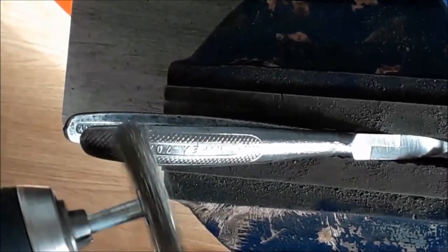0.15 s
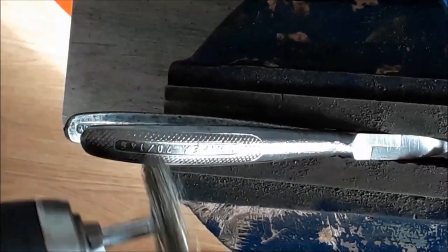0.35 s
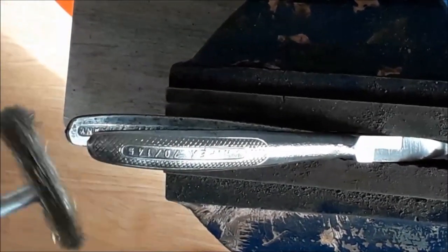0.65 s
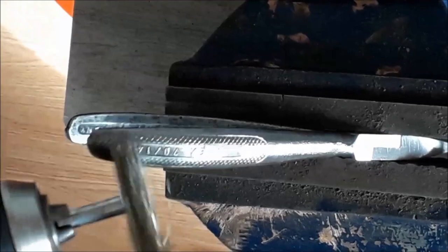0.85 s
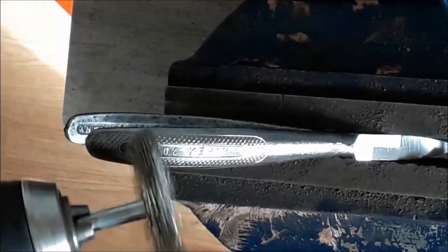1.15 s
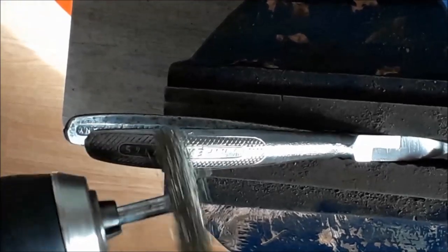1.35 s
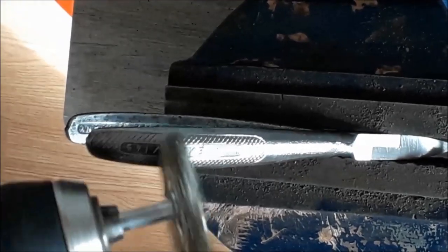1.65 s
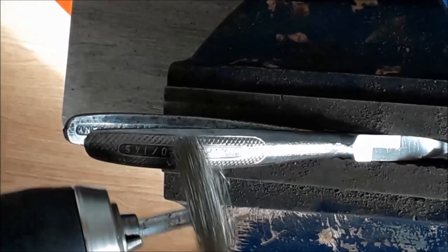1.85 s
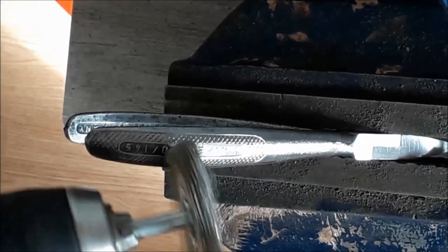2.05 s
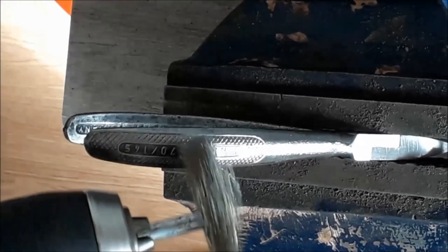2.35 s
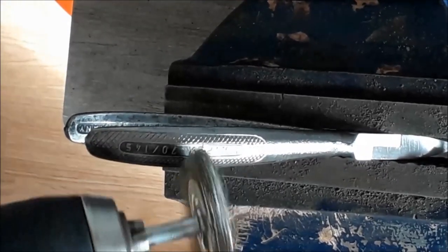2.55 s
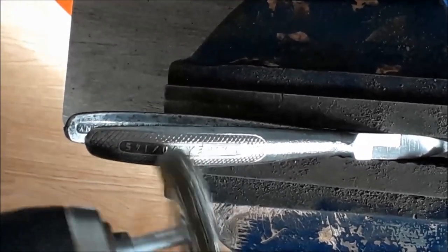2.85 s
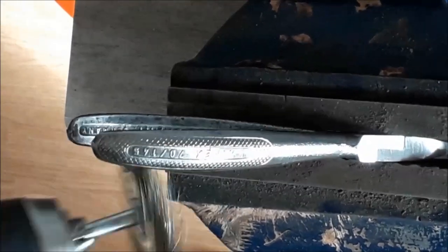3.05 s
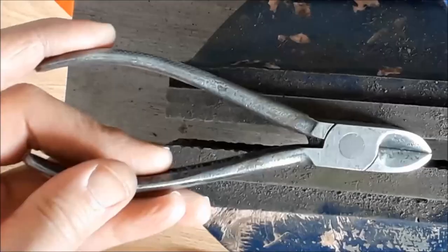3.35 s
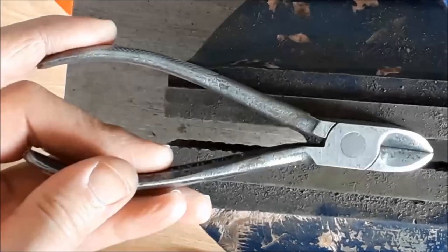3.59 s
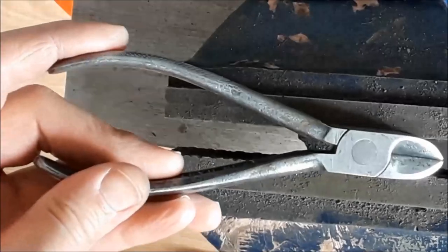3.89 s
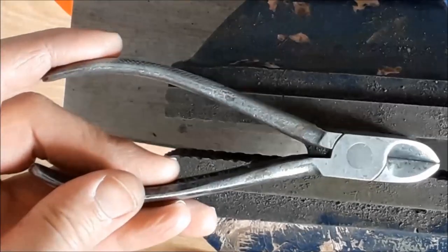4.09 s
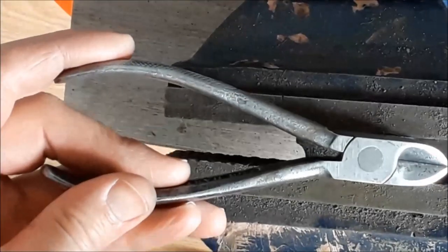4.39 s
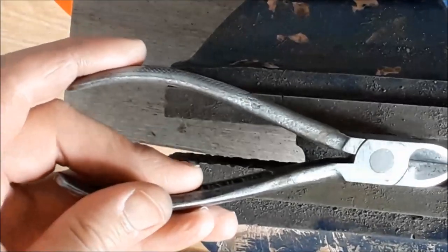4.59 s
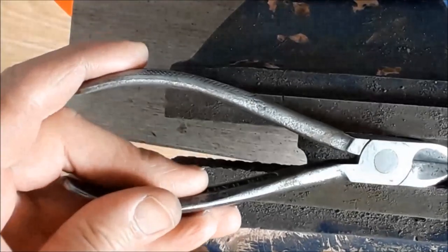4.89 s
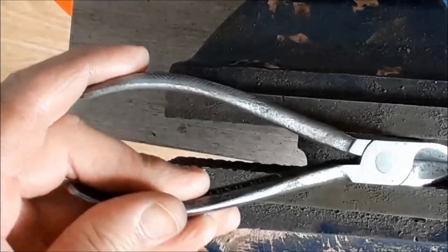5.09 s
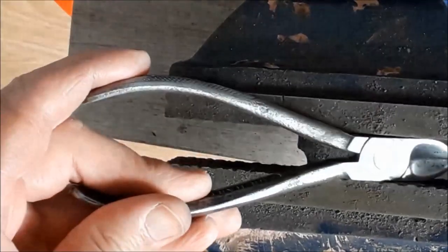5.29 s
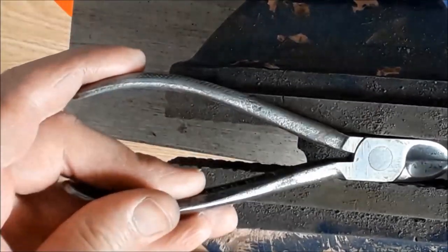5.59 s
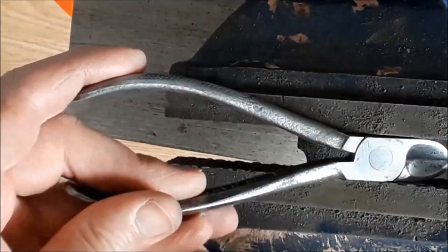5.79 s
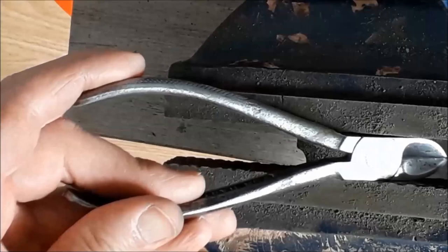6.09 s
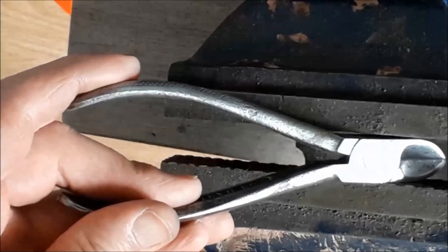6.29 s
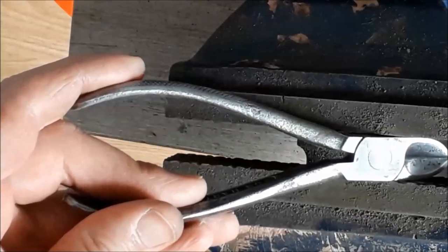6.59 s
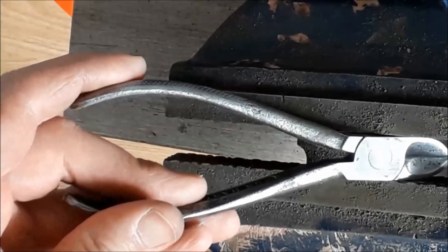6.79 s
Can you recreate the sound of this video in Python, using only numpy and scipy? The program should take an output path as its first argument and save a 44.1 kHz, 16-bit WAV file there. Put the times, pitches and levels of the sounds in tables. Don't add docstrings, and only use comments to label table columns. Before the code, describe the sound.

Close and mono in a small, fairly dry room: a shrill drill with a spinning wire brush scrubs clamped steel, pulsing slightly several times a second and speeding up when lifted. A hard cut ends it midway. Then faint hum and hand rustle, scattered wooden knocks, one very hard, a heavy set-down with a low thump and bounces, bright steel clinks, soft touches and one late firm knock.

```python
import sys
import numpy as np
from scipy import signal
from scipy.fft import rfft, irfft, next_fast_len
from scipy.io import wavfile
from scipy.ndimage import uniform_filter1d, map_coordinates

SR = 44100
rng = np.random.default_rng(int(sys.argv[2]) if len(sys.argv) > 2 else 0)


def boost(x):
    u = np.asarray(x, float) / 20
    return 10 ** u


def dump_mix(stems):
    frames = np.atleast_2d(stems).T
    limited = np.clip(frames, -1, 1)
    pcm = np.round(limited * 32767).astype(np.int16)
    wavfile.write(sys.argv[1], SR, pcm)


N = 306054
TIME = np.arange(N) / SR
CUT_S = 3.4135

# f/Hz, level/dB [per Hz]
HUM_SPECTRUM = [(24, -54), (40, -3.5), (240, -1.5), (381, -4.5), (420, -3), (808, -9.5), (873, -5.5),
                (1170, -14), (1590, -8.5), (4000, -37), (5200, -51.5), (8800, -120)]
RUSTLE_SPECTRUM = [(1180, -37.5), (2000, -7.5), (2160, 1.5), (2340, -12), (2530, -5), (5550, -1.5),
                   (7190, -2.5), (11600, -1), (15800, -16)]
# t/s, level/dB
HANDS_STIR = [(3.42, -43.5), (3.6, -47.5), (3.88, -52), (4.15, -47), (4.28, -48.5), (4.44, -60),
              (4.69, -56), (4.9, -62), (5.4, -71), (5.6, -50), (5.99, -75), (6.17, -56), (6.32, -80),
              (6.56, -77), (6.63, -52.5), (6.74, -72), (6.94, -79)]
HUM_DB, HUM_FOLLOWS = -58.5, 0.35
# f/Hz, level/dB [per Hz]
MIC_SPECTRUM = [(1760, -40), (3000, -1.5), (4280, -9.5), (5930, -7), (6770, -7.5), (7460, -10), (9650, -12),
                (11400, 3), (15800, -18)]
MIC_DB = -71.5
TOP_HZ = 15880

# f/Hz, t60/s
ROOM_DECAY = [(100, 0.28), (300, 0.22), (1000, 0.26), (4000, 0.24), (12000, 0.19)]
# f/Hz, width/Hz, level/dB
BENCH_MODES = [(213.6, 54, 1.5), (341, 35, -1.5), (469, 33, -2.5), (698, 174, -9), (1040, 100, -5)]
# f/Hz, level/dB, t60/s
STEEL_RING = [(6320, 3.5, 0.045), (10640, -14.5, 0.046), (11700, -4.5, 0.066)]
# t/s, peak level/dB, thud level/dB, treble level/dB, clack f/Hz
WOOD_KNOCKS = [
    (3.756, -28, 0, -21, 1470),
    (3.763, -38, 2, -19, 1780),
    (3.834, -29.5, -9, -24, 1710),
    (3.953, -14, -9.5, -47, 1460),
    (4.352, -6.5, -23, -18.5, 1590),
    (4.368, -41, -25, -22, 2090),
    (4.645, -42, -19, -30, 1680),
    (4.662, -24.5, -15, -22, 1560),
    (6.242, -11, -14.5, -22.5, 1570),
]
# t/s, peak level/dB, thud level/dB, treble level/dB, clack f/Hz
HEAVY_SET_DOWN = [
    (4.892, -13, -7, -16, 764),
    (4.903, -13.5, -7, -13, 1960),
    (4.911, -17, -11.5, -25, 820),
    (4.944, -15, -13.5, -21, 770),
    (4.988, -18.5, -8, -17, 770),
    (5.061, -24.5, -12, -22, 640),
    (5.12, -34, -8, -26, 830),
    (5.539, -21, -21, -10, 760),
]
# t/s, peak level/dB, thud level/dB, treble level/dB, clack f/Hz
STEEL_CLATTER = [(3.559, -36, -14, -12, 2060), (5.249, -21, -14, -19, 1730),
                 (5.256, -19.5, -11.5, -12.5, 1670), (5.262, -37, -14, -9, 2150),
                 (5.286, -24, -7, -5, 2050), (5.311, -25, -9, -26, 1630), (5.484, -28.5, -21, -11, 1550),
                 (5.498, -32, -22, -3, 2300), (5.516, -30.5, -20, -2.5, 3270),
                 (5.527, -24, -8.5, -0.5, 3060), (5.533, -12.5, -19.5, -6, 6050)]
# t/s, peak level/dB, thud level/dB, clack f/Hz
SOFT_TOUCHES = [(3.708, -34, 5, 1040), (3.724, -35.5, 6.5, 1590), (3.87, -34, -6, 1590),
                (4.01, -30, -23, 1530), (4.028, -34, -20, 2200), (4.046, -34.5, -16, 1840),
                (4.066, -36, -14, 1840), (4.205, -34, -18, 1610), (4.342, -22.5, 3.5, 1540),
                (4.859, -33.5, 5, 1560), (5.434, -42.5, -7.5, 1610), (5.699, -45.5, 3, 988),
                (5.946, -45, -1, 1050), (5.97, -42, -9, 985), (6.027, -59.5, 9, 991), (5.901, -57, 4, 990),
                (6.13, -50, -19, 1590), (6.22, -39, 3, 1590), (6.234, -16.5, -1.5, 1590),
                (6.57, -49, -3, 1580), (6.596, -38, 3, 1530), (6.617, -30.5, -7, 1260)]
# t/s, peak level/dB, clack f/Hz
THIN_TICKS = [
    (3.5194, -44, 5790),
    (4.2906, -45, 5040),
    (4.577, -45, 6910),
    (4.7268, -45, 5860),
    (5.019, -37, 5300),
]
KNOCK_MS, HEAVY_MS, CLATTER_MS, SOFT_MS, TICK_MS = 19.6, 173, 27.5, 38, 39
SOFT_TREBLE_DB, TICK_THUD_DB, TICK_TREBLE_DB = -32.5, -40, -16
JAW_HZ, JAW_WIDTH_HZ, JAW_DB = 1590, 220, 3.5
THUMP_S, TINK_S = 4.901, 3.872

# t/s, speed f/Hz
SHAFT_SPEED = [(0, 455.5), (.13, 453.5), (.3, 451.8), (.41, 452.3), (.51, 456.5), (.61, 461), (.7, 461.7),
               (.82, 461.3), (1, 452.8), (1.15, 455.7), (1.4, 453.7), (2.55, 453.8), (2.7, 454.5),
               (2.85, 456.6), (3.08, 456.9), (3.19, 463), (3.27, 459.6), (3.42, 460.4)]
# multiple, level/dB pressed on, level/dB running free
SHAFT_ORDERS = [(3, -63, -52.5), (4, -48, -43), (5, -42, -49), (6, -42, -47), (7, -41, -52),
                (9, -37.5, -44), (10, -19.5, -35), (11, -37, -37), (12, -35, -58), (13, -48, -41),
                (14, -43, -37), (15, -52, -34), (16, -45, -35), (17, -33, -45), (18, -40, -34),
                (19, -28, -35), (20, -29.5, -26), (21, -36, -37), (22, -28, -34), (23, -39, -35),
                (24, -38, -36), (25, -41, -36), (26, -30.5, -36), (27, -32, -42), (28, -39, -44),
                (29, -35, -44), (30, -35.5, -35), (31, -42, -44), (32, -41, -34), (34, -49, -40)]
# multiple, level/dB pressed on, level/dB running free
GEAR_SIDEBANDS = [(10.42, -34.5, -38), (4.55, -46.5, -62), (1, -62, -57)]
# f/Hz, level/dB [per Hz]
FAN_SPECTRUM = [(60, -63.5), (250, -47.5), (420, -41), (800, -16), (1400, -25.5), (1900, -13.5),
                (2500, -20), (3100, -4.5), (4100, -13), (5300, -2.5), (9000, -7), (11200, -6),
                (12200, -1.5), (12600, -11), (15800, -13)]
WIRE_SPECTRUM = [(700, -58.5), (1500, -20), (2100, -14), (3100, -21.5), (4200, -11), (5800, -11.5),
                 (9000, -7.5), (11300, -8), (11800, -2), (12350, -5), (12600, -13.5), (15800, -21.5)]
# f/Hz, width/Hz, level/dB
VICE_MODES = [(103, 97, -18.5), (315, 70, -6.5), (513.4, 14, 2), (589, 33, -2), (1032, 94, -8),
              (2050, 310, -16)]
# t/s, scrub level/dB through the vice
WIRE_CONTACT = [(0, -29.5), (.46, -28.5), (.49, -40), (.53, -28.5), (.65, -40), (.72, -52.5), (.83, -53.5),
                (.86, -31.5), (.94, -37.5), (.98, -30), (1.25, -29.5), (1.31, -26), (1.45, -29.5),
                (2.3, -32.5), (2.9, -32.5), (3.18, -26), (3.3, -49), (3.42, -54.5)]
WHEEL_SKIPS = [.12, .17, 1.14, 1.25, 1.335, 1.65, 1.84, 2.045, 2.18, 2.45, 2.91, 2.975]
SKIP_DB, SKIP_S = -13, .016
GEAR, WHEEL_START = 59.02, -1.15
SWING_HZ = 2.5
FIRM_DB, HANDLE_HZ = -32, 213.5
SWAY_DB, SWAY_GROWS = -32, 2.07
HISS_DB, HISS_GROWS = -15, .05


def unit(x):
    return x / np.sqrt(np.mean(x ** 2) + 1e-20)


def along(points, hz):
    f, v = np.transpose(points)
    return np.interp(np.log(hz + 1), np.log(f + 1), v)


def curves(rows):
    s, *cols = np.transpose(rows)
    return [np.interp(TIME, s, c) for c in cols]


def wobble(rate):
    knots = rng.standard_normal(int(N * rate / SR) + 4)
    return map_coordinates(knots, [np.arange(N) * rate / SR])


def filtered(x, response):
    m = next_fast_len(len(x) + 8192)
    return irfft(rfft(x, m) * response(np.fft.rfftfreq(m, 1 / SR)), m)[:len(x)]


def resonances(modes):
    def response(f):
        total = 0
        for k, (centre, width, db) in enumerate(modes):
            damping = 1j * f * width
            total = total + (-1) ** k * boost(db) * damping / (centre * centre - f * f + damping)
        return total
    return response


def rush(spectrum, patchy_db):
    z = signal.stft(rng.standard_normal(N), nperseg=512)[2]
    field = uniform_filter1d(rng.standard_normal(z.shape), size=6, axis=0)
    field = uniform_filter1d(field, size=10, axis=1)
    noise = signal.istft(z * boost(patchy_db * unit(field)), nperseg=512)[1][:N]
    return unit(filtered(noise, lambda hz: boost(along(spectrum, hz))))


def tail(size):
    hz, t, z = signal.stft(rng.standard_normal(size), SR, nperseg=256)
    decay = boost(-60 * t / along(ROOM_DECAY, hz)[:, None])
    x = signal.istft(z * decay, SR, nperseg=256)[1][:size]
    return x / np.linalg.norm(x)


def workshop():
    rustle_db, = curves(HANDS_STIR)
    hum_db = HUM_DB + HUM_FOLLOWS * (rustle_db + 58)
    hum = boost(hum_db + 1.5 * wobble(18)) * rush(HUM_SPECTRUM, patchy_db=-0.5)
    rustle = boost(rustle_db - 6.0 + 1.2 * wobble(30)) * rush(RUSTLE_SPECTRUM, patchy_db=1.2)
    mic_hiss = boost(MIC_DB) * rush(MIC_SPECTRUM, patchy_db=1.2)
    return (hum + rustle + mic_hiss) * (TIME > CUT_S)


def contacts():
    soft = [(s, db, thud_db, SOFT_TREBLE_DB, hz) for s, db, thud_db, hz in SOFT_TOUCHES]
    ticks = [(s, db, TICK_THUD_DB, TICK_TREBLE_DB, hz) for s, db, hz in THIN_TICKS]
    kinds = [(WOOD_KNOCKS, KNOCK_MS), (soft, SOFT_MS), (HEAVY_SET_DOWN, HEAVY_MS),
             (STEEL_CLATTER, CLATTER_MS), (ticks, TICK_MS)]
    return [(*row, ms) for rows, ms in kinds for row in rows]


def bright_edge(f):
    highpass = (1j * f / 1900) ** 2 / (1 + 1j * f / 1900) ** 2
    return highpass / (1 + 1j * f / 6000) ** 2 / (1 + (f / 12800) ** 12)


def wooden_thud(f):
    highpass = (1j * f / 130) ** 2 / (1 + 1j * f / 130) ** 2
    return resonances(BENCH_MODES)(f) * highpass / (1 + 1j * f / 1300) ** 3


def clack_of(hz):
    body = resonances([(hz, .6 * hz, 0), (1.7 * hz, 1.6 * hz, -3)])
    jaw = resonances([(JAW_HZ, JAW_WIDTH_HZ, JAW_DB)])
    return lambda f: body(f) ** 2 * (1 + jaw(f))


def bench_shake(t):
    modes = [(93.5, 19, 5), (121, 22, -0.5), (172, 71, -0.5)]
    shake = filtered(rng.standard_normal(len(t)) * boost(-60 * t / 0.43), resonances(modes))
    return boost(-11.0) * shake / np.abs(shake).max()


def steel_tink(t):
    ring = sum(boost(level - 60 * t / t60) * np.sin(2 * np.pi * hz * t) for hz, level, t60 in STEEL_RING)
    return boost(-38) * ring * (1 - np.exp(-t / 0.0011))


def knocks():
    out, size = np.zeros(N + SR), SR // 2
    t = np.arange(size) / SR
    for s, db, thud_db, treble_db, hz, ms in contacts():
        length = max(ms, 3) / 1000
        attack = (1 - np.exp(-t / min(.1 * length, .005))) ** 2
        burst = rng.standard_normal((3, size)) * boost(-60 * t / length) * attack
        burst *= boost(3.6 * np.repeat(rng.standard_normal(size // 90 + 1), 90)[:size])
        colours = [wooden_thud, clack_of(hz), bright_edge]
        shares_db = [thud_db + 2.5, -4, treble_db + 9.5]
        for noise, colour, share_db in zip(burst, colours, shares_db):
            direct = filtered(noise, colour)
            build_up = 1 - np.exp(-t / (0.0013 + 0.25 * length))
            walls = filtered(tail(size) * build_up, colour)
            both = direct + boost(-2) * walls * np.linalg.norm(direct) / np.linalg.norm(walls)
            out[round(s * SR):][:size] += boost(db + share_db) * both / np.abs(direct).max()
    out[round(THUMP_S * SR):][:size] += bench_shake(t)
    out[round(TINK_S * SR):][:size] += steel_tink(t)
    return out[:N]


def gear_whine(load, wheel, shaft):
    whine = np.zeros(N)
    for k, pressed_db, free_db in SHAFT_ORDERS + GEAR_SIDEBANDS:
        db = free_db + load * (pressed_db - free_db)
        bite_swing_db = 6 * load * np.cos(wheel + (1.3 if k == 22 else .3)) * (21 < k < 29)
        bite_swing_db += 6 * load * np.cos(wheel - 2.1) * (k == 9)
        flutter_db = (3.6 - 3.2 * load if k == 10 else 1.8) * wobble(15) + .12 * k * wobble(70)
        phase = k * shaft + .0011 * k * k * wobble(110)
        whine += boost(db + bite_swing_db + flutter_db + 4 + .03 * k) * np.sin(phase)
    return whine


def fan_and_wire_hiss(scrub_db, load, bite_db, shaft):
    hiss_db = HISS_DB + HISS_GROWS * (scrub_db - FIRM_DB) + 0.32 * wobble(8.2)
    fan = rush(FAN_SPECTRUM, patchy_db=1.5) * boost(.3 * np.cos(shaft))
    wires = boost(0.5 * bite_db + 1.1 * wobble(40)) * load * rush(WIRE_SPECTRUM, patchy_db=2.0)
    return boost(hiss_db - 3.0) * (fan + wires)


def wire_scrub(scrub_db, bite_db, wheel):
    scrub_db = scrub_db + .7 * np.cos(wheel + 2.9) + 0.92 * wobble(10) + 2.1 * wobble(45)
    unrest_db = 0.72 * wobble(150) + 0.25 * wobble(24.93) + 1.0 * bite_db
    rubbing = unit(rng.standard_normal(N) * boost(unrest_db))
    return filtered(boost(scrub_db) * rubbing, resonances(VICE_MODES)) * boost(22.0)


def handle_sway(scrub_db, wheel):
    sway_db = SWAY_DB + SWAY_GROWS * np.minimum(scrub_db - FIRM_DB, 0)
    sway_db += 1.3 * np.cos(wheel - .8) + 1.5 * wobble(12)
    sway_db += SKIP_DB * np.exp(-((TIME - np.c_[WHEEL_SKIPS]) / SKIP_S) ** 2).sum(axis=0)
    tufts_db = 2.6 * np.cos(8 * wheel) + 1.5 * wobble(22)
    phase = 2 * np.pi * HANDLE_HZ * TIME + 1.2 * wobble(26)
    return boost(sway_db + 2.5 + tufts_db) * np.sin(phase)


def drill():
    (speed,), (scrub_db,) = curves(SHAFT_SPEED), curves(WIRE_CONTACT)
    load = np.clip((461.5 - speed) / 10.6, 0, 1)
    side_on = np.clip(.45 + TIME / 2, 0, 1)
    swing = SWING_HZ * np.minimum(load, .8) * side_on
    wheel = 2 * np.pi * np.cumsum(speed) / SR / GEAR + WHEEL_START
    swung_speed = speed + swing * (np.cos(wheel) + 0.29 * np.sin(2 * wheel))
    shaft = 2 * np.pi * np.cumsum(swung_speed) / SR
    bite_db = load * np.cos(wheel - 1.8)
    sound = gear_whine(load, wheel, shaft)
    sound += fan_and_wire_hiss(scrub_db, load, bite_db, shaft)
    sound += wire_scrub(scrub_db, bite_db, wheel)
    sound += handle_sway(scrub_db, wheel)
    return sound * np.clip((CUT_S - TIME) / 0.0005, 0, 1)


def scene():
    return np.tile(workshop() + knocks() + drill(), (2, 1))


def roll_off(x):
    return signal.sosfilt(signal.butter(12, 17090, fs=SR, output="sos"), x)


def record(dry):
    mono = filtered(dry[0], lambda f: (1j * f / 62) ** 3 / (1 + 1j * f / 62) ** 3)
    mono = mono / (1 + np.abs(mono / .85) ** 4) ** (1 / 4)
    mono = filtered(mono, lambda f: np.sin(np.pi / 2 * np.clip((TOP_HZ - f) / 160, 0, 1)) ** 2)
    return roll_off(np.array([mono, mono]))


dry = scene()
out = record(dry)
dump_mix(out)
```